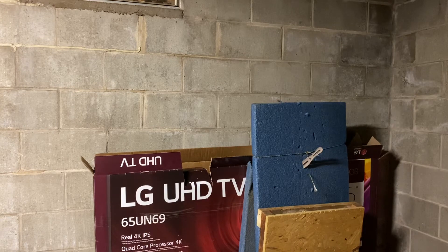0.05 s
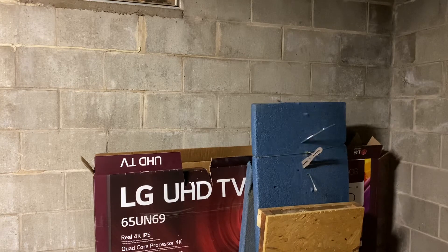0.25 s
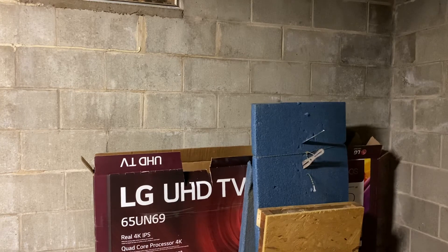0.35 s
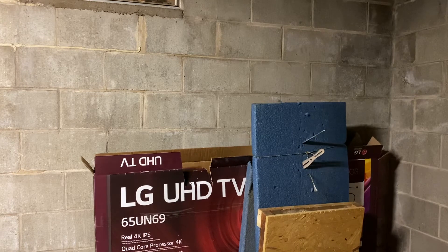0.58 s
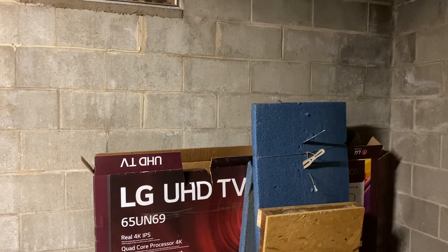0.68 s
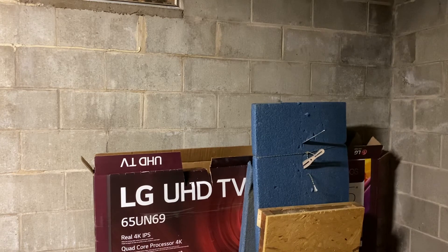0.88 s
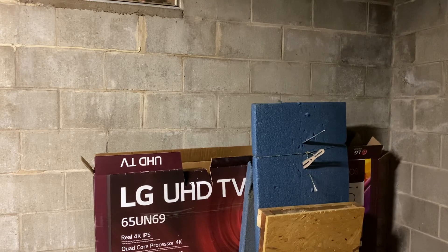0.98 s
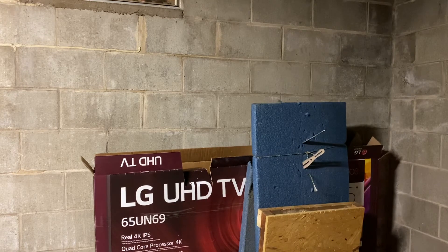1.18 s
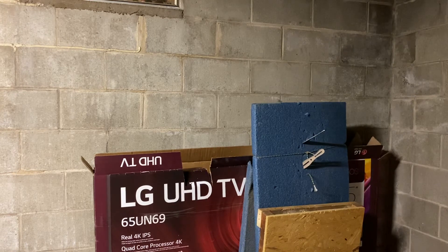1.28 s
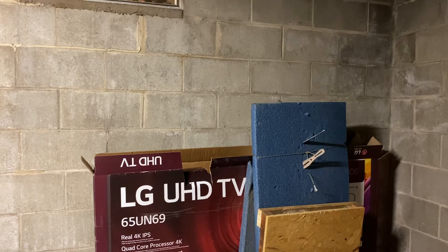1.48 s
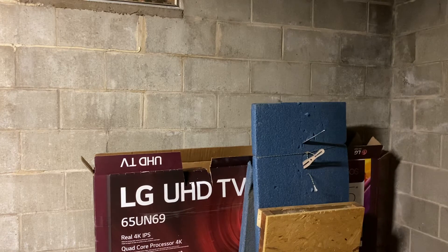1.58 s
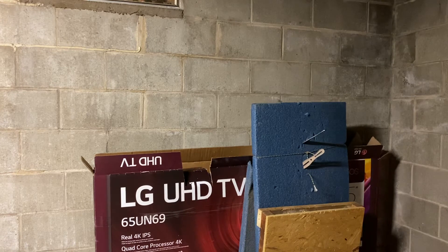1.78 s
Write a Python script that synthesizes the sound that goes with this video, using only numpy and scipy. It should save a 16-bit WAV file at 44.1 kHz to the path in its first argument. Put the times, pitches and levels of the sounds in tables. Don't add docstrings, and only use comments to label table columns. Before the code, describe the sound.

A knife sticks into a target block with a sharp cracking thud and low hollow cardboard boom, then a loose blade rattles down in quick taps; a metallic snap follows nearby. Quiet bare basement, close stereo microphone.

```python
import sys
import numpy as np
from scipy import signal
from scipy.fft import rfft, irfft
from scipy.io import wavfile
from scipy.ndimage import uniform_filter1d

SR = 44100
rng = np.random.default_rng(int(sys.argv[2]) if len(sys.argv) > 2 else 0)


def persist_wave(psi):
    counts = np.round(np.clip(psi, -1, 1) * 32767).astype(np.int16)
    wavfile.write(sys.argv[1], SR, np.atleast_2d(counts).T)


def gain_from_decibels(decibels):
    exponent = np.asarray(decibels, float) / 20
    return 10 ** exponent


N = 81585
T = np.arange(N) / SR

# frequency [Hz], density [dB per Hz].
AIR_COLOUR = [(30, -39), (100, -1.5), (230, -18), (400, -13), (800, -14.5), (2170, -19.5), (6000, -28),
              (9000, -40), (14000, -58.5)]
AIR_DB, HUM_HZ, HUM_WIDTH_HZ, HUM_DB = -65.5, 106.4, 44, -71.5
# time [s], gain [dB].
REDUCER_GAIN = [(0, -5), (.2, -6.5), (.3, 13.5), (.5, 4.5), (.9, 6.5), (1.18, 5), (1.3, 2), (1.85, 0)]

RUSTLE_S = [.01, .1, .7, 1.56, 1.73, 1.02, 1.06, .52, .93, .61, .77, .9, 1.08, 1.15, .018, 1.0, .46, 1.7,
            .08, .76]
# length [s], level [dB], centre [Hz], width [octaves].
RUSTLE_SHAPE = [(0.11, -66, 9400, 0.47), (0.039, -70, 9870, 0.42), (0.55, -76.5, 8900, 0.72),
                (0.036, -85, 11000, .5), (0.089, -77, 8800, 0.62), (0.24, -59, 350, 1),
                (0.028, -68.5, 7560, 0.021), (.012, -58, 7100, 1), (0.017, -75, 13000, 0.28),
                (0.065, -53, 104, 0.32), (0.059, -53, 94, 0.1), (0.11, -54, 104, 0.32),
                (0.041, -57, 100, 0.32), (0.038, -58.5, 113.4, 0.12), (0.017, -73, 2470, 0.51),
                (0.57, -70.5, 1160, 0.045), (0.023, -52, 120, 0.13), (0.15, -70.5, 2220, 0.2),
                (0.034, -68.5, 110, .3), (0.13, -67, 62, 0.44)]

# frequency [Hz], level [dB].
FLIGHT_MODES = [(5028, -95), (7246, -91), (9830, -69.5), (9938, -76), (10374, -87), (12635, -80),
                (13017, -87), (15590, -86)]
FLIGHT_S, FLIGHT_RISE_S, FLIGHT_FALL_S, FLIGHT_DB = 0.077, 0.027, 0.062, 15

# frequency [Hz], t60 [s].
ROOM_T60 = [(200, 1), (1000, 0.34), (3000, 0.35), (8000, 0.25), (14500, 0.27), (15800, 0.065)]
ROOM_DB, ROOM_GAP_S = -6, 0.0021

STAB_S = [.2095, .212, .2133, .2148, .2168, .219, .2222, .2295, .244, .252, .265]
STAB_DB = [-31, -13, -16, -19, -17.5, -15, -19, -24, -25.5, -37.5, -40.5]
# frequency [Hz], level [dB].
CRACK_COLOUR = [(500, -26.5), (1500, -16.5), (3500, -4.5), (6500, -12.5), (10000, -1), (12000, -11.5),
                (15500, -9)]
# frequency [Hz], level [dB].
WOOD_COLOUR = [(150, -7), (300, -3.5), (500, -14.5), (800, -8), (1200, -17), (1800, -12.5), (2400, -25)]
WOOD_LATE_S, WOOD_RISE_S = 0.003, 0.0069
# frequency [Hz], level [dB], t60 [s].
BLOCK_MODES = [(796, -14.5, 0.03), (1111.5, -9, 0.035), (1830, -10.5, 0.025), (1924, -15.5, 0.042),
               (2592, -11, 0.03), (3490, -20, 0.04), (3500, -9, 0.07), (4161, -16.5, 0.09),
               (5940, -23.5, .07), (6650, -21, .05), (9530, -17.5, 0.11), (9400, -14, 0.052),
               (9970, -9.5, 0.0346), (10710, -11.5, .05)]
BLOCK_DB = -32.5

# start [s], level [dB].
EDGE = [
    (.2115, -24),
    (.6965, -58),
    (1.169, -41),
]
# frequency [Hz], level [dB].
EDGE_COLOUR = [(6000, -30), (12000, -5), (15000, 1), (16000, 24)]

# frequency [Hz], level [dB], swell [s], t60 [s].
BOOM_MODES = [(38.18, -59, .02, 0.43), (55.7, -34.5, 0.021, 0.63), (75.44, -40.5, 0.041, 0.61),
              (96.4, -39, 0.0091, 0.76), (116.5, -42.5, 0.03, 0.3), (145.5, -39.5, 0.024, 0.46),
              (172, -43, 0.018, 0.35), (216.3, -43, 0.011, 0.207), (286, -47, 0.005, 0.1)]
BOOM_S = 0.214
BOOM_HOLD = 3.35

# start [s], level [dB].
KNOCK = [
    (.232, -51),
    (.258, -39),
    (.308, -49),
    (.365, -51),
    (.44, -59),
]
# frequency [Hz], level [dB], t60 [s].
KNOCK_MODES = [(565, -8, .07), (615, -2, .06), (645, 0, .07), (720, -8, .05)]
# frequency [Hz], level [dB].
KNOCK_SOFT = [(400, -35), (540, 0), (760, 0), (1000, -35)]

# start [s], level [dB], brightness [dB].
CHATTER = [(0.4315, -43, -16), (0.4943, -43, -18), (0.5353, -42, -19), (0.5801, -45, -24),
           (0.6221, -45, -19), (0.656, -44, -23), (0.6969, -44, -19), (0.7313, -44, -25),
           (0.7742, -45, -20), (0.8031, -46, -23), (0.8455, -48, -19), (0.869, -50, -20),
           (0.9004, -48, -21), (0.9219, -51, -19), (0.9518, -52, -21), (1.0271, -55, -20),
           (1.0551, -54, -22)]
# frequency [Hz], level [dB].
CHATTER_BODY = [(500, -23), (1160, -0.5), (2000, 1.5), (3100, 0.5), (4300, -1), (5500, -6), (7300, -3),
                (8200, -31.5)]
# frequency [Hz], level [dB].
CHATTER_TOP = [(7000, -11), (9200, 6.5), (11000, -9), (16000, -21)]
# frequency [Hz], level [dB], t60 [s].
LOOSE_MODES = [(1138, -4, 0.054), (1530, -0.5, 0.018), (1926, 2, 0.02), (2470, 1, 0.014),
               (3350, -2.5, 0.034), (3625, -1, 0.029), (4310, -2, 0.036), (4600, -3.5, .02),
               (7350, -12.5, 0.033), (9130, -7, 0.051)]
TAP_T60_S, TAP_RISE_S = 0.035, 0.003

# start [s], level [dB].
SNAP = [(1.1685, -32), (1.170, -32.5), (1.1755, -38.5), (1.178, -35), (1.184, -40), (1.188, -34),
        (1.195, -33.5), (1.204, -51), (1.212, -45)]
# frequency [Hz], level [dB].
SNAP_COLOUR = [(2000, -34), (2600, -7), (3200, -9), (4300, -16.5), (5400, -3), (6500, -13.5), (7400, -2.5),
               (10200, -6), (16000, -17)]
# frequency [Hz], level [dB], t60 [s].
STEEL_MODES = [(3127, -12, 0.056), (3540, -18.5, 0.027), (5070, -12.5, 0.036), (5920, -15, 0.033),
               (6900, -12.5, .03), (7360, -1, 0.036), (7640, -6, 0.026), (9980, -8.5, 0.038),
               (10480, -6, .03), (10900, -20, 0.023), (12610, -14, .04), (13110, -18, 0.031),
               (14190, -23, .05)]

# frequency [Hz], level [dB].
APART = [(40, -50), (200, -15), (480, -13), (800, -2.5), (2500, -4), (7000, -2), (9500, -8), (16000, -6)]
# frequency [Hz], level difference [dB].
BALANCE = [(90, 0), (220, -3.5), (400, -1.5), (800, 0), (1500, 0), (2500, 3), (5000, 2.5), (7000, 0)]
# frequency [Hz], gain [dB].
TREBLE_END = [(15000, 0), (15700, -24), (16900, -32), (17200, -80)]
# frequency [Hz], phase lead [rad].
LEAD = [(50, 0), (340, -2.4), (520, -4.4), (1200, -6.3), (3000, -5.7), (7000, -6.4), (9730, -12.1),
        (10900, -13.6), (11600, -15.6), (12400, -15.8), (13200, -18.4), (14800, -19.5), (15700, -22),
            (16100, -25.2)]


def curve(table, hz):
    points = np.array(table)
    return np.interp(np.log(hz + 1), np.log(points[:, 0]), points[:, 1])


def colour(x, table):
    gain = gain_from_decibels(curve(table, np.fft.rfftfreq(N, 1 / SR)))
    return irfft(rfft(x) * gain, N)


def unit(x):
    return x / np.sqrt(np.mean(x ** 2))


def fade(s, t60):
    return (T >= s) * np.exp(-np.log(1000) * np.maximum(T - s, 0) / t60)


def walk(rate):
    k = int(SR / rate)
    return unit(uniform_filter1d(uniform_filter1d(rng.standard_normal(N), k), k))


def ring(x, modes, flutter_db=-0.5):
    t = T[:SR // 2]
    loose = np.minimum(t / 0.0084, 1)
    response = 0
    for hz, db, t60 in modes:
        level = gain_from_decibels(db + flutter_db * loose * walk(64)[:len(t)])
        tone = np.sin(2 * np.pi * hz * t + 0.87 * walk(60)[:len(t)])
        response = response + level * tone * np.exp(-np.log(1000) * t / min(t60, 0.4))
    return signal.fftconvolve(x, response)[:N]


def bursts(rows, t60, grit_db, rise=0.00007):
    noise = rng.standard_normal(N) * gain_from_decibels(grit_db * rng.standard_normal(N))
    envelope = sum(gain_from_decibels(r[1]) * fade(r[0], t60) * np.clip((T - r[0]) / rise, 0, 1) for r in rows)
    return unit(noise) * envelope


def air():
    bed = np.array([unit(colour(rng.standard_normal(N), AIR_COLOUR)) for _ in range(2)])
    bed = bed * gain_from_decibels(AIR_DB + 1.6 * walk(21))
    hz = np.fft.rfftfreq(N, 1 / SR)
    resonance = 1 + ((hz - HUM_HZ) / HUM_WIDTH_HZ * 2) ** 2
    hum = unit(irfft(rfft(rng.standard_normal(N)) / resonance, N))
    opening = np.interp(T, *np.array(REDUCER_GAIN).T)
    bed[0] += hum * gain_from_decibels(HUM_DB - 0.28 * opening)
    return bed * gain_from_decibels(opening)


def rustle():
    octave = np.log2(np.fft.rfftfreq(N, 1 / SR) + 1)
    total = 0
    for s, (length, db, hz, wide) in zip(RUSTLE_S, RUSTLE_SHAPE):
        envelope = gain_from_decibels(db + 0.5 * walk(33)) * np.exp(-((T - s) / length) ** 2)
        band = np.exp(-((octave - np.log2(hz)) / wide) ** 2)
        total = total + envelope * unit(irfft(rfft(rng.standard_normal(N)) * band, N))
    return total


def flight():
    d = T - FLIGHT_S
    envelope = np.exp(-(d / np.where(d < 0, FLIGHT_RISE_S, FLIGHT_FALL_S)) ** 2)
    total = 0
    for hz, db in FLIGHT_MODES:
        level = gain_from_decibels(db + FLIGHT_DB + 4.5 * walk(90))
        total = total + level * np.sin(2 * np.pi * hz * T + 0.17 * walk(151))
    return envelope * total


def room(x):
    hz, t, spec = signal.stft(rng.standard_normal((2, SR)), SR, nperseg=256)
    t60 = np.maximum(curve(ROOM_T60, hz), 0.05)[:, None]
    tails = signal.istft(spec * np.exp(-np.log(1000) * t / t60), SR, nperseg=256)[1]
    tails = tails * np.clip(np.arange(tails.shape[1]) / SR / ROOM_GAP_S - 1, 0, 1)
    return signal.fftconvolve(x[None], tails / np.sqrt(np.sum(tails[0] ** 2)), axes=1)[:, :N]


def stab():
    cracks = bursts(zip(STAB_S, STAB_DB), 0.016, 0.45, 0.00039)
    late = [(s + WOOD_LATE_S, db) for s, db in zip(STAB_S, STAB_DB)]
    wood = bursts(late, 0.046, 1.2, WOOD_RISE_S)
    split = colour(cracks, CRACK_COLOUR) + gain_from_decibels(-1.0) * colour(wood, WOOD_COLOUR)
    return split * (T >= STAB_S[0]) + gain_from_decibels(BLOCK_DB) * ring(cracks, BLOCK_MODES)


def edges():
    return colour(bursts(EDGE, 0.012, 1.5), EDGE_COLOUR)


def boom():
    d = np.maximum(T - BOOM_S, 0)
    total = 0
    for hz, db, rise, t60 in BOOM_MODES:
        fall_db = 60 * np.maximum(d - BOOM_HOLD * rise, 0) / t60
        level = gain_from_decibels(db - fall_db + 2.0 * walk(14)) * (1 - np.exp(-(d / rise) ** 2))
        total = total + level * np.sin(2 * np.pi * hz * d + 0.91 * walk(12))
    return total


def knock():
    blows = np.diff(sum(gain_from_decibels(db) * (T >= s) for s, db in KNOCK), prepend=0)
    return colour(ring(blows, KNOCK_MODES, 1.8), KNOCK_SOFT)


def chatter():
    taps = bursts(CHATTER, TAP_T60_S, 0.82, TAP_RISE_S)
    top = bursts([(s, db + bright) for s, db, bright in CHATTER], 0.052, 1.2, 0.001)
    noise = gain_from_decibels(1.0) * colour(taps, CHATTER_BODY) + gain_from_decibels(11.5) * colour(top, CHATTER_TOP)
    return noise + gain_from_decibels(-28.0) * ring(taps, LOOSE_MODES)


def snap():
    clicks = gain_from_decibels(-1.5) * bursts(SNAP, 0.032, 0.8, 0.00054)
    return colour(clicks, SNAP_COLOUR) + gain_from_decibels(-28.5) * ring(clicks, STEEL_MODES)


def scene():
    far = stab() + knock() + chatter()
    near = snap() + flight()
    wet = gain_from_decibels(ROOM_DB) * room(far + near) + air()
    mid = far + near + boom() + rustle() + edges() + wet[0]
    apart = colour(wet[1], APART)
    return np.array([mid + apart, mid - apart])


def low_pass(x):
    return signal.sosfilt(signal.butter(12, 17100, fs=SR, output="sos"), x)


def record(dry):
    hz = np.fft.rfftfreq(N, 1 / SR)
    half = np.array([[0.5], [-0.5]])
    lead = np.interp(hz, *np.array(LEAD).T)
    ports = gain_from_decibels(half * curve(BALANCE, hz) + curve(TREBLE_END, hz)) * np.exp(1j * half * lead)
    mix = irfft(rfft(dry) * ports, N)
    return low_pass(mix)


dry = scene()
out = record(dry)
persist_wave(out)
```